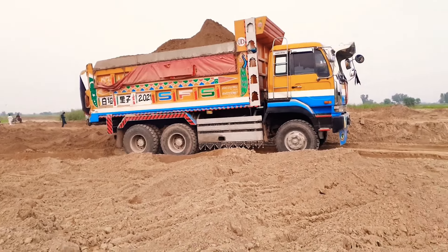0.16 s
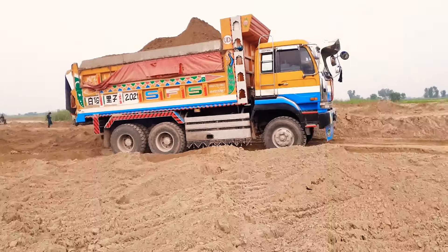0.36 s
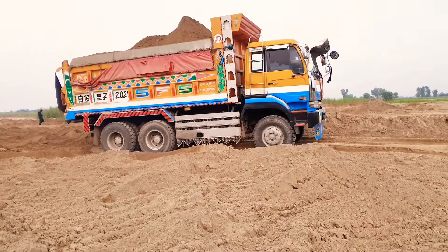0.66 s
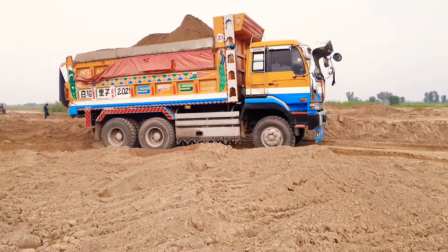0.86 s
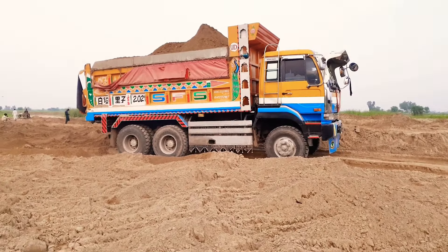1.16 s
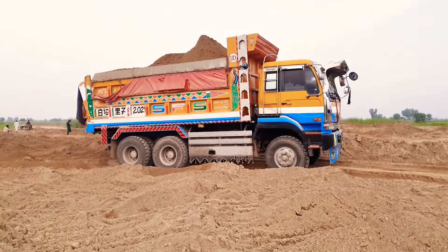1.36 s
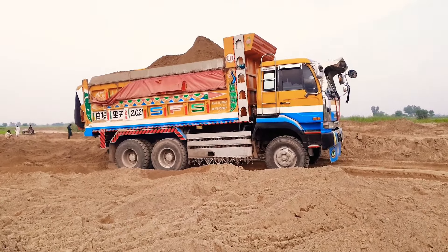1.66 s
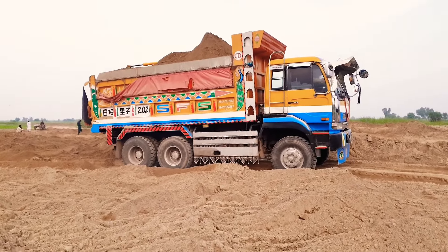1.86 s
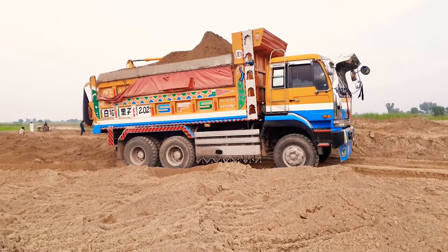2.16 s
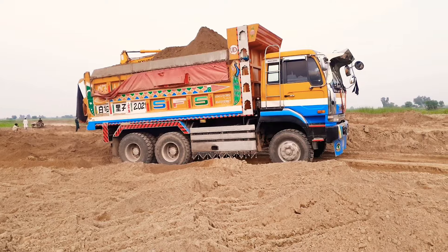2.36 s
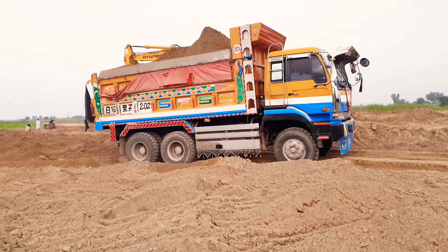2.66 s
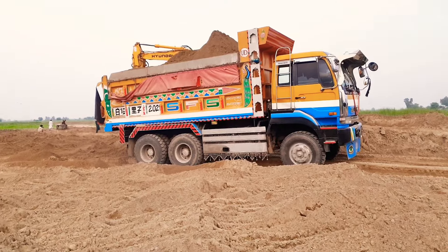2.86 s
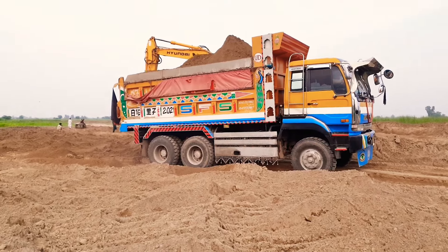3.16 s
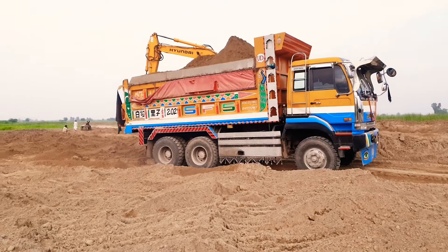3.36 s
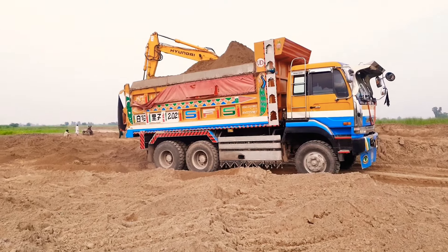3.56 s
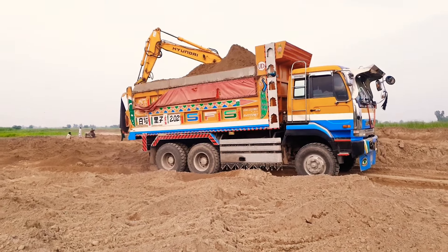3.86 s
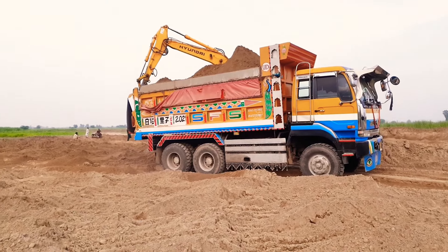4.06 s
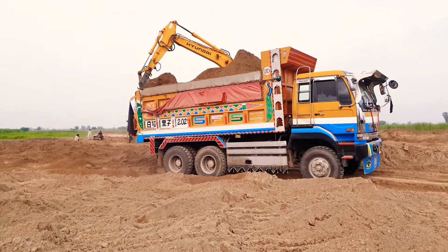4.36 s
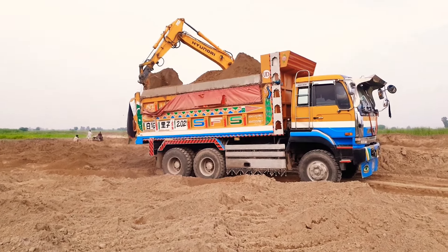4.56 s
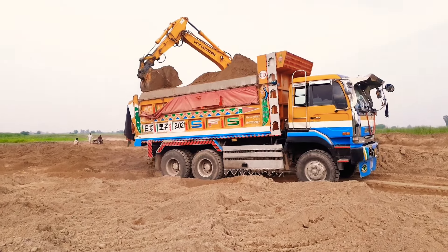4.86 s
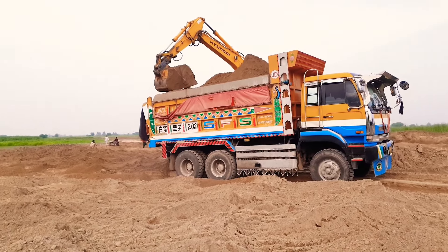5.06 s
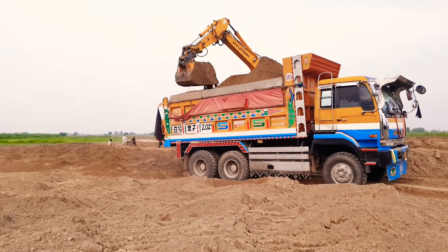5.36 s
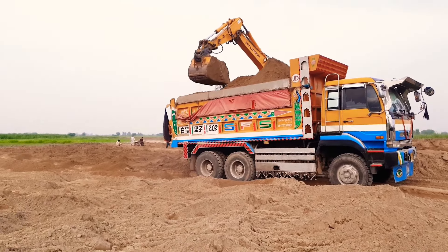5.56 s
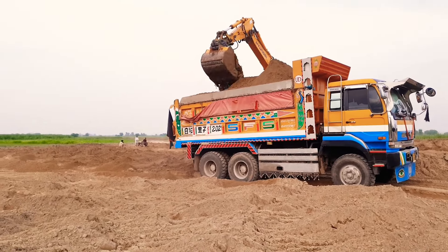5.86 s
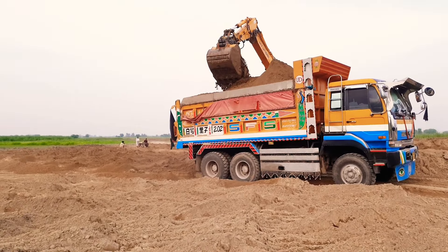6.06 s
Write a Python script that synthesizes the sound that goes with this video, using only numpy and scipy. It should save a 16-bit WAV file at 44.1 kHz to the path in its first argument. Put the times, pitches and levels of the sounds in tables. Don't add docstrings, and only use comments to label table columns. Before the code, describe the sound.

Outdoors at an open digging site, a diesel truck idles with a fast uneven clatter over an excavator's low steady drone and broad engine roar. Small metal clinks and faint bird chirps come first. Around the middle, wind starts thumping the stereo microphone, air hisses and a bird trills on the right. A short hydraulic moan follows, then a hollow metal bucket knock rings briefly, with a softer knock after.

```python
import sys
import numpy as np
from scipy import signal
from scipy.fft import rfft, irfft, next_fast_len
from scipy.io import wavfile

SR = 44100
rng = np.random.default_rng(int(sys.argv[2]) if len(sys.argv) > 2 else 0)


def output_pcm(signal):
    pcm = np.clip(np.atleast_2d(signal).T, -1, 1) * 32767
    wavfile.write(sys.argv[1], SR, np.round(pcm).astype(np.int16))


def volts_from_decibels(level):
    exponent = np.asarray(level, float) / 20
    return 10 ** exponent


N = 274302
TIME_S = np.arange(N) / SR

# t/s, f/Hz
FIRING_TONE = [(0, 74.1), (.85, 73.8), (1.13, 76.1), (1.37, 71.6), (1.6, 74.8), (2.6, 74.5), (2.9, 73.9),
               (3.4, 74.5), (3.7, 74.1), (3.8, 76.4), (4.1, 74.9)]
# t/s, level/dB
EXHAUST_LEVEL = [(0, -22.5), (.36, -20), (.43, -20), (.74, -22.5), (.97, -20.5), (1.19, -25), (1.44, -21.5),
                 (2.04, -22.5), (2.13, -20.5), (2.37, -23), (2.51, -22), (2.84, -25.5), (3.03, -22),
                 (3.2, -24.5), (5.8, -23), (5.93, -26), (5.98, -18.5), (6.1, -21.5)]
ORDER_THIRDS = (2, 5, 6, 9, 11, 12)
ORDER_LEVELS_DB = [-51, -29.5, -43, -29.5, -39, -31.5]
# t/s, level/dB
PUMP_LEVEL_CURVE = [(0, -38.5), (1.5, -39.5), (3.6, -39), (4.3, -37.5), (4.7, -37), (4.95, -50),
                    (5.05, -35.5), (5.5, -38), (5.62, -52), (5.8, -60), (5.83, -32), (6.0, -33),
                    (6.1, -41.5), (6.22, -37)]
# f/Hz, wander/Hz, rms level/dB
PUMP_TONES = [(233.2, 2.495, -51.5), (40, 0.77, -54), (61.6, 1.78, -49.5)]
# t/s, peak level/dB, thump f/Hz
HARD_FIRINGS = [(0.101, -33, 910), (0.228, -28.5, 767), (0.421, -32, 760), (0.683, -39, 710),
                (0.746, -28.5, 755), (1.149, -30, 776), (1.336, -31.5, 866), (1.396, -37, 640),
                (1.67, -45, 660), (1.763, -38, 700), (1.829, -33, 830), (1.865, -34, 740),
                (2.021, -38, 700), (2.125, -31, 684), (2.192, -30, 735), (2.284, -32, 710),
                (2.422, -42, 720), (2.447, -39, 619), (2.58, -31, 710), (2.71, -39, 596), (2.867, -33, 665),
                (3.2326, -37, 2225), (3.331, -31, 760), (3.36, -39, 730), (3.726, -36, 840),
                (3.7524, -35, 2250), (3.754, -27, 684), (3.797, -28, 794), (3.837, -31, 840),
                (3.984, -39, 820), (4.062, -29.5, 700), (4.142, -46, 636), (4.39, -38, 686),
                (4.735, -41, 685), (4.803, -39, 664), (4.892, -34, 690), (4.928, -30, 666),
                (5.089, -31, 727), (5.13, -47, 710), (5.195, -33, 674), (5.425, -32, 805),
                (5.554, -36, 1070), (5.653, -33, 760), (5.929, -34, 735), (6.049, -38, 790),
                (6.188, -35, 802)]
# t/s, f/Hz, level/dB
BOOM_MOAN = [
    (4.6, 678, -80),
    (4.72, 683, -47),
    (4.95, 687, -45.5),
    (4.98, 685, -74),
]

KNOCK_REGISTERS_HZ = (1000, 2000)
# low, middle, high knock level/dB, valve tick level/dB
CYLINDER_LEVELS = [(4.5, 6, 6, -15), (-5, 2.5, -0.5, -12), (-1, -3.5, -8, 2), (0, 1, 6.5, -5),
                   (5, -5, -10, 0), (3, -6, -17, -1), (-4, 5, -8, 3), (-0.3, -13, -4.5, 4.5)]
# f/Hz, width/Hz, level/dB
BLOCK_MODES = [(233, 112, 3.5), (660, 180, 1.5), (790, 233, 4.5), (1133, 64, 6), (1370, 51, 2),
               (1675, 174, 0), (2227, 190, -1), (2900, 170, -2.5), (3150, 320, -11), (4450, 840, -23.5)]

# t/s, level/dB
BUCKET_KNOCKS = [
    (5.5455, -24),
    (5.554, -27),
    (5.885, -44),
    (6.108, -41),
]
# f/Hz, width/Hz, level/dB
BUCKET_MODES = [(293, 144, 0), (720, 190, -4.5), (1055, 53, 4), (1220, 45, -13), (1290, 100, -2),
                (1333, 120, 4.5), (1670, 12, -8.5), (1650, 100, 2), (1860, 73, -1), (2300, 160, -7),
                (2450, 200, -5.5), (2900, 270, -14), (3320, 430, -27), (3850, 180, -20), (4530, 370, -24),
                (6200, 500, -35), (11100, 5000, -45)]
# f/Hz, t60/s, peak level/dB
SHELL_MODES = [(232.4, 0.1, -14.5), (336.5, 0.17, -25)]
# f/Hz, level/dB, time to fall by 80 dB/s
PLATE_MODES = [(727, -30, 0.2), (1060, -19, 0.16), (1230, -18, 0.25), (1320, -8, 0.13), (1460, -18, 0.19),
               (1620, -10, 0.096), (1730, -16, 0.11), (2273, -16.5, 0.2), (1940, -13, 0.12),
               (2396, -16, 0.22), (2470, -19, 0.13), (2920, -17, 0.11), (3860, -25, 0.08)]
# t/s, level/dB
KNOCK_CONTACTS = [(5.546, -4.5), (5.5507, 1), (5.554, -0.5), (5.5579, -1.5), (5.565, -7), (5.57, -10),
                  (5.579, -13), (5.59, -20), (5.6, -18)]
# t/s, level/dB
LINKAGE_CLINKS = [(1.007, -44.5), (2.138, -43), (2.149, -32.5), (2.198, -56), (2.266, -45), (2.285, -62),
                  (5.545, -34.5), (6.055, -47)]
# f/Hz, width/Hz, level/dB
LINKAGE_MODES = [(1500, 470, 1), (2350, 110, 2.5), (2960, 120, -0.5), (3300, 970, -4), (3650, 170, -5),
                 (5560, 500, -10.5), (6760, 900, -13), (7500, 500, -26), (11000, 4000, -24)]
# t/s, peak level/dB
GRIT_SNAPS = [
    [(1.0075, -46.5), (2.1545, -48), (2.268, -48), (5.547, -48), (6.058, -48)],
    [(0.0423, -54), (1.0076, -57), (1.2072, -56), (3.4401, -50), (3.5558, -50), (3.8232, -55),
     (3.8886, -50), (3.9644, -55), (4.1794, -60), (4.6034, -53), (5.1267, -59), (5.5513, -46),
     (5.5997, -49.5), (6.0586, -55)],
]

# t/s, f between dips/Hz, level/dB
TRILL_TONE = [(3.648, 2740, -62), (3.652, 2790, -35), (3.670, 3140, -29), (3.700, 3240, -31.5),
              (3.716, 3115, -32.5), (3.722, 2450, -40), (3.735, 2350, -40), (3.742, 2300, -50)]
TRILL_DIPS = [(3.6632,), (3.6775,), (3.6922,), (3.7072,)]
# t/s, f/Hz, level/dB
BIRD_TICKS = [(.29, 3250, -63), (.305, 6200, -70), (.318, 4100, -66), (.325, 5000, -68), (.335, 3950, -65),
              (.775, 4870, -61), (2.266, 3650, -62), (2.562, 5100, -68), (2.836, 5200, -67)]
# start t/s, length/s, start f/Hz, end f/Hz, level/dB
BIRD_GLIDES = [(1.742, .013, 3250, 2400, -61), (1.768, .04, 2300, 2200, -63),
               (1.979, 0.044, 2720, 3480, -55.5), (2.027, 0.043, 3330, 2720, -57.5),
               (3.592, 0.0095, 3880, 3650, -47), (3.599, 0.0059, 3700, 2400, -46),
               (3.615, 0.0072, 3730, 2800, -47.5), (3.606, 0.0038, 2600, 3700, -50),
               (3.637, 0.0095, 5810, 2770, -42.5), (5.715, 0.034, 2960, 3850, -62),
               (5.73, 0.034, 2840, 3650, -57), (5.757, 0.041, 3300, 2660, -59),
               (5.790, 0.018, 3650, 3150, -64)]
# start t/s, length/s, edge f/Hz, middle f/Hz, level/dB
BIRD_ARCHES = [(1.61, 0.013, 2750, 2820, -67), (1.63, .012, 2750, 2800, -68), (1.642, .02, 2750, 2800, -62),
               (1.687, 0.045, 3300, 3180, -60), (3.54, .009, 2800, 3000, -55),
               (3.552, 0.011, 3750, 3600, -53), (3.564, 0.010, 2600, 2830, -46.5),
               (3.578, 0.01, 3620, 3300, -47), (3.585, 0.007, 2490, 2900, -50),
               (3.608, 0.013, 3480, 3740, -43)]

# t/s, level/dB
WIND_LEVEL = [(3.1, -51), (3.35, -46.5), (3.7, -48), (4.08, -58), (4.2, -38), (4.28, -52), (4.6, -42),
              (4.8, -35.5), (4.96, -30), (4.99, -40), (5.1, -37), (5.25, -50), (5.55, -38.5), (5.8, -46),
              (5.88, -39.5), (6.05, -43.5), (6.22, -47)]
# t/s, peak level/dB, left minus right/dB
GUST_THUDS = [(3.35, -28, 7), (3.73, -32, -2), (3.99, -40, -8), (4.05, -42, -3), (4.14, -27, 7),
              (4.21, -45, 19), (4.44, -30, -9), (4.55, -29, 3), (4.645, -19.5, -7), (4.72, -24, 0),
              (4.82, -16, -3), (4.93, -24, 2), (5.05, -33, -1), (5.15, -31, 7), (5.24, -34, 0),
              (5.55, -35, 4), (5.65, -42, 5), (5.76, -23, 5), (5.87, -38, 6), (5.979, -32, 11),
              (6.05, -33, -2), (6.18, -32, 6)]
# t/s, peak level/dB
EDDY_POPS = [
    [(3.716, -22), (4.180, -22), (4.195, -16), (4.227, -19), (4.471, -24), (4.632, -17), (4.652, -17),
     (4.674, -24), (4.730, -19), (4.827, -14), (4.880, -19), (4.899, -16), (4.930, -16), (4.962, -17),
     (5.043, -16), (5.151, -22), (5.490, -23), (5.640, -27), (5.750, -18), (5.970, -26), (6.015, -26)],
    [(4.160, -25), (4.367, -24), (4.640, -17), (4.741, -21), (4.849, -22), (4.918, -18), (4.958, -19),
     (5.058, -22), (5.148, -24), (5.408, -24), (5.508, -25), (5.598, -23), (5.750, -20), (5.866, -26)],
]

# t/s, level/dB
SITE_LOAD = [(0, 1), (1.73, 0.3), (2.06, 1.95), (3.22, 0.5), (3.91, 4), (4.45, 2), (4.9, 0.9), (5.13, 0),
             (5.54, 1.6), (5.75, 0.9), (6.22, 1.7)]
# f/Hz, density/dB per Hz
ROAR_SPECTRUM = [(15, -44), (25, -21), (47, -8.5), (81, -5.5), (103, -12.5), (156, -18), (195, -17.5),
                 (245, -20), (330, -22), (487, -31.5), (666, -23.5), (860, -25), (1220, -33.5),
                 (1520, -42.5), (2000, -54), (2600, -81), (4400, -120)]
# f/Hz, density/dB per Hz
SIZZLE_SPECTRUM = [(1500, 1), (1950, -5), (2250, -8.5), (2600, -8.5), (3150, -11.5), (3450, -13.5),
                   (7600, -22.5), (8600, -27), (9400, -19), (11500, -23), (15700, -33)]
# f/Hz, correlation
PORT_LIKENESS = [(60, 0.52), (300, 0.96), (640, 1), (950, 0.98), (1300, 0.15), (2200, 0.64), (3500, 0.14),
                 (5000, 0.08), (12000, 0.15)]

# f/Hz, left minus right/dB, left lead/rad
PORT_COLOUR = [(59.7, -2, 0), (185, -1, -1), (324, -3.5, 0.6), (810, -2.5, -0.54), (1086, -3.5, 1.94),
               (1370, 1, 0.47), (1797, -4.5, 1), (1870, 1, -2), (2300, -7.5, 2), (2330, -1.5, -0.85),
               (6570, -3, -2), (7640, -8, 5.5), (9900, 2.5, 2), (11700, -5, 0.5), (12900, -10.5, 5),
               (14000, -16, -11)]
# start t/s, hold/s, depth/dB
BASS_DROPS = [(3.315, 0.071, 6.5), (3.762, 0.028, 15), (4.11, .01, 8), (4.274, 0.31, 6), (4.914, 0.063, 34),
              (5.431, 0.38, 22), (6.095, .2, 10)]
# start t/s, hold/s, depth/dB
GUST_DUCKS = [
    (4.984, 0.026, 1),
    (5.758, 0.064, 2),
]


def rms_one(x):
    return x / np.sqrt(np.mean(x ** 2) + 1e-20)


def in_time(rows):
    t_s, *columns = np.transpose(rows)
    return [np.interp(TIME_S, t_s, column) for column in columns]


def at_hz(points, hz):
    points = np.array(points)
    return np.interp(np.log(hz), np.log(points[:, 0]), points[:, 1])


def drift(rate_hz):
    r = np.exp(-80 * np.pi * rate_hz / SR)
    slow = signal.lfilter([1], [1, -2 * r, r * r], rng.standard_normal(N // 40 + 2002))[2000:]
    return np.interp(np.arange(N) / 40, np.arange(len(slow)), rms_one(slow))


def swell(start_s, hold_s, rise_s, fall_s):
    t = TIME_S - start_s
    return np.clip(np.minimum(1 + t / abs(rise_s), 1 - (t - abs(hold_s)) / abs(fall_s)), 0, 1)


def sine(hz):
    return np.sin(2 * np.pi * np.cumsum(hz) / SR)


def resonate(x, hz, width_hz):
    r = np.exp(-np.pi * width_hz / SR)
    poles = [1, -2 * r * np.cos(2 * np.pi * hz / SR), r * r]
    return signal.lfilter([(1 - r * r) / 2, 0, (r * r - 1) / 2], poles, x)


def band(x, low_hz, high_hz, order=2):
    return signal.sosfilt(signal.butter(order, [low_hz, high_hz], "band", fs=SR, output="sos"), x)


def dying(clicks, t60_s):
    return signal.lfilter([1], [1, -volts_from_decibels(-60 / (t60_s * SR))], clicks + 1e-18)


def bass_cut_db():
    thin_from_s, ramp_s, edge_s = 3.45, 0.83, 0.047
    cut_db = 7.5 * swell(thin_from_s + ramp_s, N / SR, ramp_s, 1)
    return cut_db + sum(db * swell(s, hold_s, edge_s, edge_s) for s, hold_s, db in BASS_DROPS)


def duck_db():
    edge_s = 0.0087
    return -sum(db * swell(s, hold_s, edge_s, edge_s) for s, hold_s, db in GUST_DUCKS)


def excavator():
    (firing_hz,), (level_db,), (pump_db,) = map(in_time, (FIRING_TONE, EXHAUST_LEVEL, PUMP_LEVEL_CURVE))
    level_db = level_db - bass_cut_db()
    firing_db = level_db + 0.14 * drift(8.0) + 0.13 * np.minimum(level_db + 30.0, 0)
    firing_turns = np.cumsum(firing_hz) / SR + 0.07
    tone = np.sin(2 * np.pi * firing_turns) * volts_from_decibels(firing_db)

    crank = 2 * np.pi * np.cumsum(24.78 + .08 * drift(1.5)) / SR
    for thirds, below_db in zip(ORDER_THIRDS, ORDER_LEVELS_DB):
        order_db = np.maximum(level_db, -30) + below_db + 0.29 * drift(4.1)
        tone += volts_from_decibels(order_db) * np.sin(thirds * crank + rng.uniform(0, 2 * np.pi))

    pump_turns = 103.24 * TIME_S + 0.55 + .02 * drift(2.0)
    tone += volts_from_decibels(pump_db + 1.2 * drift(4.0)) * np.sin(2 * np.pi * pump_turns)
    for hz, wander_hz, db in PUMP_TONES:
        tone += volts_from_decibels(db + 2.0 * drift(2.3)) * sine(hz + wander_hz * drift(2.88))
    return np.sqrt(2) * tone


def hard_firings():
    out, t = np.zeros(N + SR), np.arange(round(.06 * SR)) / SR
    for s, db, hz in HARD_FIRINGS:
        crack = volts_from_decibels(-6.0) * band(rng.standard_normal(len(t)), 1100, 3000)
        shape = volts_from_decibels(db - 4.5 - 60 * t / 0.046) * (1 - np.exp(-t / 0.00058))
        out[round(s * SR):][:len(t)] += shape * (np.sin(2 * np.pi * hz * t) + crack)
    return out[:N]


def moan():
    hz, level_db = in_time(BOOM_MOAN)
    return volts_from_decibels(level_db + 2.0 * drift(25.0)) * sine(hz + 4.8 * drift(13.6))


def truck(mid_db, top_db):
    firing_hz, first_s, tick_lag_s = 30.60, .0955, .004
    count = int(N / SR * firing_hz) + 2
    turn = np.arange(count) - 3
    chance = rng.standard_normal((count, len(BLOCK_MODES) + 3))
    firing_s = first_s + turn / firing_hz + .001 * chance[:, 0]
    at = np.clip((firing_s * SR).astype(int), 0, N - 1)
    *knock_db, tick_db = np.array(CYLINDER_LEVELS)[turn % 8].T
    white = rng.standard_normal((3, N))
    burst = white[0] + 0.63 * white[1:]

    knocks = np.zeros((2, N))
    for k, (hz, width_hz, db) in enumerate(BLOCK_MODES):
        register = np.searchsorted(KNOCK_REGISTERS_HZ, hz)
        chance_db = 1.3 * chance[:, 1] + 1.7 * np.tanh(chance[:, 3 + k])
        clicks = np.zeros(N)
        clicks[at] = volts_from_decibels(knock_db[register] + db + chance_db)
        rattle = burst * (dying(clicks, t60_s=.075) + volts_from_decibels(db - 14.0))
        blow = volts_from_decibels(14.0) * clicks
        knocks += resonate(rattle + blow, hz, width_hz) * (-1) ** k

    clicks = np.zeros(N)
    clicks[np.minimum(at + round(tick_lag_s * SR), N - 1)] = volts_from_decibels(0.55 * tick_db + 1.2 * chance[:, 2])
    ticks = band(white[1:] * dying(dying(clicks, t60_s=0.09), t60_s=0.012), 8400, 12900)
    return volts_from_decibels(mid_db - 5.5) * rms_one(knocks) + volts_from_decibels(top_db - 7.5) * rms_one(ticks)


def struck(blows, body, t60_s):
    clicks = np.zeros(N)
    for s, db in blows:
        clicks[round(s * SR)] = volts_from_decibels(db)
    white = rng.standard_normal((3, N))
    contact = rms_one(dying(dying(clicks, t60_s), 0.004))
    rattle = (white[0] + .5 * white[1:]) * contact * volts_from_decibels(-40.0)
    return sum(volts_from_decibels(db) * np.sqrt(SR / width_hz) * resonate(rattle, hz, width_hz) * (-1) ** k
               for k, (hz, width_hz, db) in enumerate(body))


def plates():
    out = np.zeros(N)
    t = np.arange(round(.3 * SR)) / SR
    for s, db in KNOCK_CONTACTS:
        for hz, level_db, t60_s in PLATE_MODES:
            ring_db = db + level_db - 27.0 + 2.0 * rng.standard_normal() - 80.0 * t / t60_s
            ring = volts_from_decibels(ring_db) * np.sin(2 * np.pi * hz * t + rng.uniform(0, 2 * np.pi))
            out[round(s * SR):][:len(t)] += ring * (1 - np.exp(-t / 0.0013))
    return out


def bucket():
    t = np.maximum(TIME_S - BUCKET_KNOCKS[0][0], 0)
    rise = 1 - np.exp(-(t / 0.012) ** 2)
    shell = sum(volts_from_decibels(db + 5.5 - 60 * t / t60_s) * rise * np.sin(2 * np.pi * hz * t)
                for hz, t60_s, db in SHELL_MODES)
    knocks = volts_from_decibels(-23.0) * struck(BUCKET_KNOCKS, BUCKET_MODES, t60_s=0.16)
    clinks = volts_from_decibels(-33.5) * struck(LINKAGE_CLINKS, LINKAGE_MODES, t60_s=0.083)
    return shell + plates() + knocks + clinks


def snaps():
    out = 0
    for rows, low_hz, high_hz, t60_s in zip(GRIT_SNAPS, (1600, 8800), (7600, 15500), (0.03, 0.05)):
        clicks = np.zeros(N)
        for s, db in rows:
            clicks[round(s * SR)] = volts_from_decibels(db - 8.5)
        out = out + dying(clicks, t60_s) * rms_one(band(rng.standard_normal(N), low_hz, high_hz))
    return out * volts_from_decibels([[-1.5], [1.5]])


def trill():
    top_hz, level_db = in_time(TRILL_TONE)
    dip = sum(np.clip(1 - abs(TIME_S - s) / 0.0033, 0, 1) + 0.2 * swell(s, 0, 0.0088, 0.0046)
              for s, in TRILL_DIPS)
    phase = 2 * np.pi * np.cumsum(top_hz * (1 - 0.29 * dip)) / SR
    partials = volts_from_decibels(-18 * dip) * np.sin(phase)
    partials += volts_from_decibels(-15 - 14 * (top_hz < 2600)) * np.sin(2 * phase)
    partials += volts_from_decibels(-25) * np.sin(3 * phase)
    partials += volts_from_decibels(-43 + 23 * dip) * np.sin(3 * phase + phase / 2)
    sounding = (TIME_S > TRILL_TONE[0][0]) & (TIME_S < TRILL_TONE[-1][0])
    return partials * volts_from_decibels(level_db) * sounding * volts_from_decibels([[-17], [0]])


def birds():
    tick_s, tick_fall, hang = 0.011, 0.06, 0.2
    notes = [(s, tick_s, hz * (1 + tick_fall / 2), hz, hz * (1 - tick_fall / 2), db)
             for s, hz, db in BIRD_TICKS]
    notes += [(s, length_s, a, (a + b) / 2 + hang * max(a - b, 0), b, db)
              for s, length_s, a, b, db in BIRD_GLIDES]
    notes += [(s, length_s, edge, middle, edge, db) for s, length_s, edge, middle, db in BIRD_ARCHES]
    out = np.zeros(N)
    for s, length_s, start_hz, middle_hz, end_hz, db in notes:
        u = np.linspace(-1, 1, round(length_s * SR))
        bend_hz = (start_hz + end_hz) / 2 - middle_hz
        hz = middle_hz + (end_hz - start_hz) / 2 * u + bend_hz * u ** 2
        phase = 2 * np.pi * np.cumsum(hz) / SR
        loud = db > -47
        tone = np.sin(phase) + volts_from_decibels(-9.0) * loud * np.sin(2 * phase)
        tone += volts_from_decibels(-17.0) * loud * (start_hz > 3400) * np.sin(phase + phase / 2)
        at = round(s * SR)
        out[at:at + len(u)] += volts_from_decibels(db + 7.0) * np.sqrt(1 - u ** 4) * tone
    out = out * volts_from_decibels(1.2 * drift(90.0))
    ground = volts_from_decibels(-15.0) * np.roll(out, round(0.0052 * SR))
    off_truck = volts_from_decibels(-16.0) * np.roll(out, round(0.034 * SR))
    early = TIME_S < 3
    return (out + ground + off_truck) * volts_from_decibels(np.where(early, [[-5], [0]], [[-17], [0]]))


def air_hiss():
    start_s, attack_s, end_s = 3.535, 0.015, 4.922
    on = swell(start_s + attack_s, end_s - start_s - attack_s, attack_s, .002)
    burst_db = 10 * swell(start_s + 0.042, 0.12, 0.064, .03) * (1 + 0.23 * drift(60.0))
    hiss = rms_one(band(rng.standard_normal(N), 2500, 7200, order=6))
    return on * volts_from_decibels(-64.5 + burst_db + 1.5 * drift(30.0)) * hiss * volts_from_decibels([[-20], [6]])


def wind():
    rise_s, fall_s, range_db, floor_db = 0.09, 0.097, 22, -49.5
    wind_db, = in_time(WIND_LEVEL)
    calm = TIME_S < WIND_LEVEL[0][0]
    rumble_db = np.where(calm, -54, wind_db + 0.51 * np.minimum(wind_db + 43.0, 0))
    thud_db, lean_db = np.where(calm, -52, floor_db), 0
    for s, db, side_db in GUST_THUDS:
        shape = swell(s, 0, rise_s, fall_s)
        thud_db = np.maximum(thud_db, np.where(shape > 0, db - range_db * (1 - shape), floor_db))
        lean_db = lean_db + side_db * shape
    lumps = np.array([volts_from_decibels(8.5 * np.tanh(drift(27.0))), volts_from_decibels(8.1 * np.tanh(drift(33.0)))])
    white = rng.standard_normal((3, N))
    pressure = 0.42 * white[0] + white[1:]
    upper = volts_from_decibels(-14) * band(white[1:], 163, 255, order=3)
    rumble = rms_one(lumps * (band(pressure, 55.0, 139.0) + upper))
    thuds = rms_one(band(pressure, 44.0, 76.6, order=3) + volts_from_decibels(-11.5) * band(pressure, 23, 52))
    lean = volts_from_decibels(lean_db * np.array([[.5], [-.5]]))
    lull = volts_from_decibels(3.5 * duck_db())
    return lull * lean * (rumble * volts_from_decibels(rumble_db + 6.5) + thuds * volts_from_decibels(thud_db - 1.0))


def pops():
    pulses = np.zeros((2, N))
    for port, rows in enumerate(EDDY_POPS):
        for k, (s, db) in enumerate(rows):
            pulses[port, round((s - .005) * SR)] = volts_from_decibels(db + 46) * (-1) ** k
    pulses = pulses + 1e-18
    swing = band(pulses, 64, 130.3, order=3) + volts_from_decibels(-9.0) * band(pulses, 166, 269, order=4)
    return swing + volts_from_decibels(-18.0) * swing[::-1]


def stereo_noise(spectrum, patchy_db, count):
    size = next_fast_len(N)
    hz = np.maximum(np.arange(size // 2 + 1) * SR / size, 1)
    alike = np.clip(at_hz(PORT_LIKENESS, hz), -1, 1)
    mid, side = rfft(rng.standard_normal((2, size)))
    pair = np.sqrt(1 + alike) * mid + np.sqrt(1 - alike) * side * [[1], [-1]]
    pair = volts_from_decibels(at_hz(spectrum, hz)) * pair
    place = np.interp(np.log(hz), np.log([spectrum[0][0], spectrum[-1][0]]), [0, count - 1])
    together = drift(5.4)
    out = 0
    for k in range(count):
        flicker = volts_from_decibels(patchy_db * (0.45 * together + drift(25.0)))
        out = out + flicker * irfft(pair * np.clip(1 - abs(place - k), 0, 1), size)[:, :N]
    return rms_one(out)


def site_roar(roar_db, top_db):
    roar = volts_from_decibels(roar_db + 7.5) * stereo_noise(ROAR_SPECTRUM, patchy_db=0.74, count=8)
    sizzle = stereo_noise([(900, -21)] + SIZZLE_SPECTRUM, patchy_db=2.0, count=6)
    return roar + volts_from_decibels(0.34 * roar_db + top_db + 28.5) * sizzle


def through_ports(x):
    size = next_fast_len(N + 4096)
    hz = np.maximum(np.arange(size // 2 + 1) * SR / size, 1)
    lean_db, lead_rad = at_hz(PORT_COLOUR, hz), at_hz(np.array(PORT_COLOUR)[:, ::2], hz)
    half = np.array([[.5], [-.5]])
    return irfft(rfft(x, size) * volts_from_decibels(lean_db * half) * np.exp(1j * lead_rad * half), size)[:, :N]


def scene():
    load_db, = in_time(SITE_LOAD)
    roar_db, top_db = -44.5 + 0.72 * load_db, -68 + 0.78 * load_db
    knock_db = -0.48 + 4.5 * swell(4.4, 0, 2.45, 1)
    machines = excavator() + hard_firings() + moan() + truck(knock_db - 45.5, top_db) + bucket()
    machines = through_ports(machines + site_roar(roar_db, top_db))
    singing = band(birds() + trill(), 1500, 7900, order=6)
    buffeting = .2 * np.tanh((wind() + pops()) / .2)
    return machines + singing + air_hiss() + snaps() + buffeting


def band_limit(x):
    return signal.sosfilt(signal.butter(12, 15760, fs=SR, output="sos"), x)


def record(dry):
    top_cut = signal.ellip(10, .5, 70, 15770, fs=SR, output="sos")
    mix = signal.sosfilt(top_cut, dry * volts_from_decibels(duck_db()))
    return band_limit(mix)


dry = scene()
out = record(dry)
output_pcm(out)
```